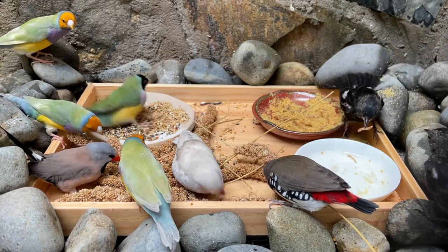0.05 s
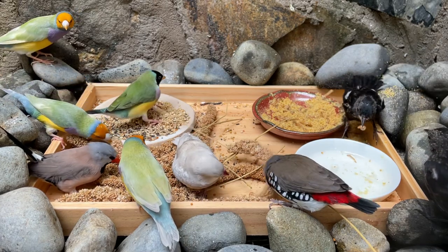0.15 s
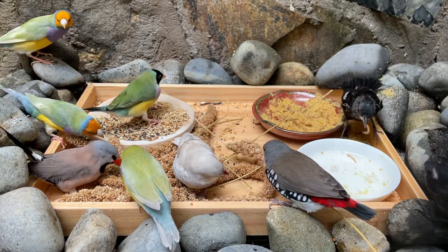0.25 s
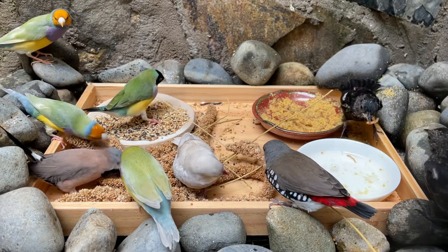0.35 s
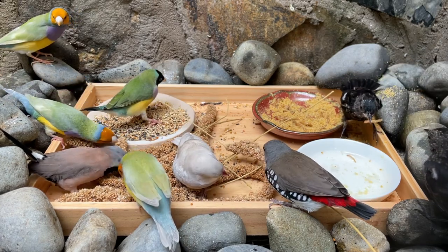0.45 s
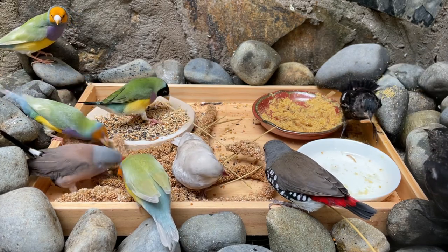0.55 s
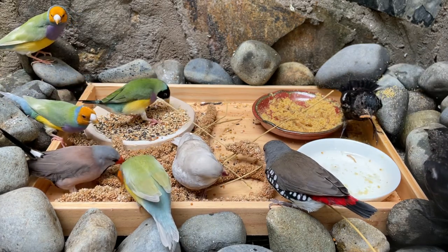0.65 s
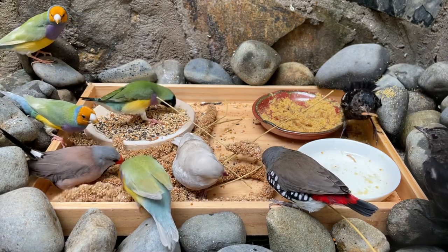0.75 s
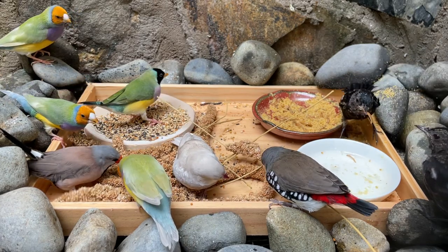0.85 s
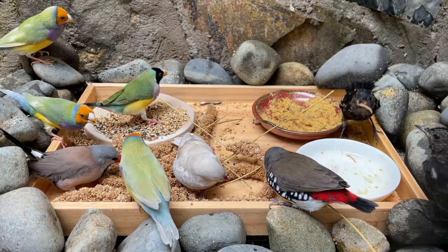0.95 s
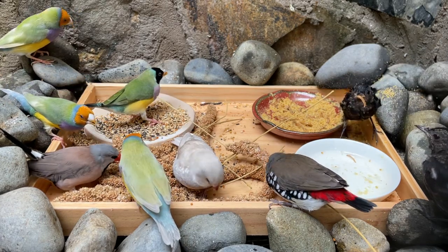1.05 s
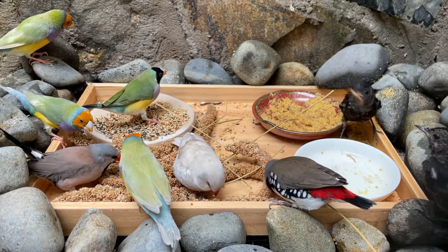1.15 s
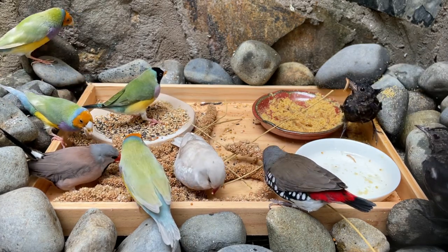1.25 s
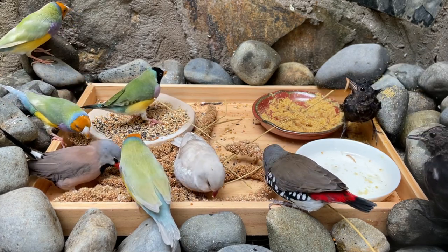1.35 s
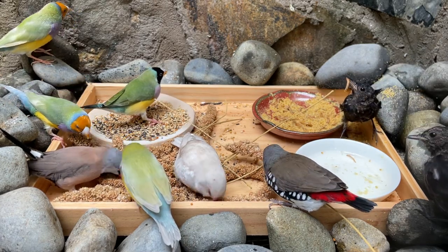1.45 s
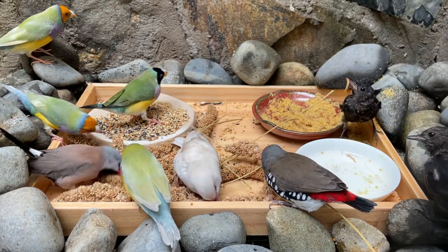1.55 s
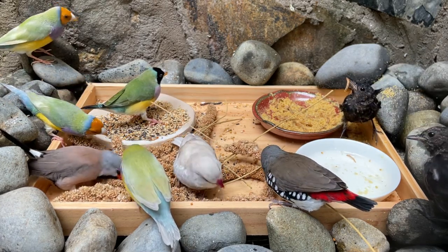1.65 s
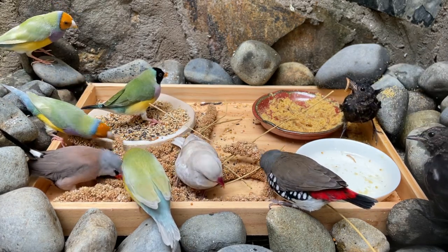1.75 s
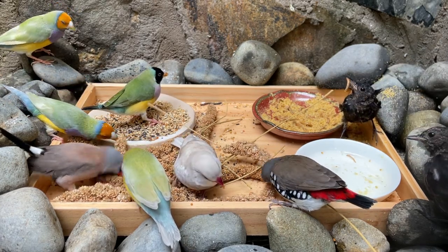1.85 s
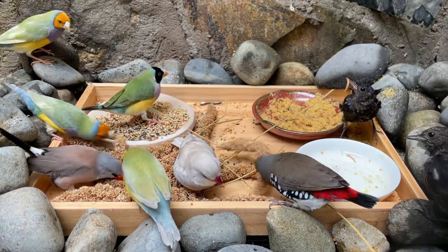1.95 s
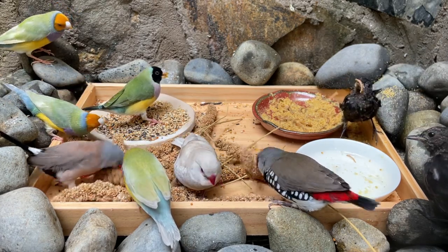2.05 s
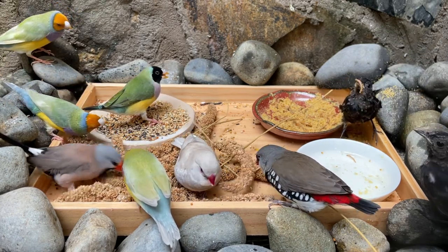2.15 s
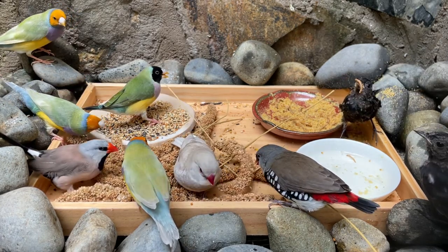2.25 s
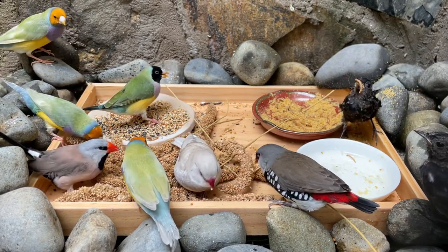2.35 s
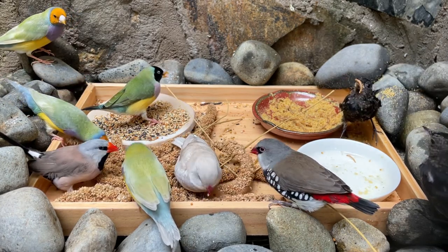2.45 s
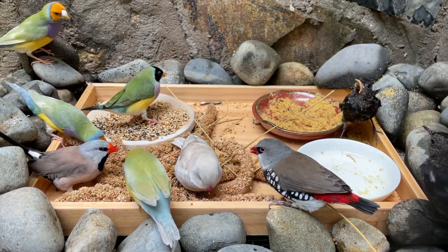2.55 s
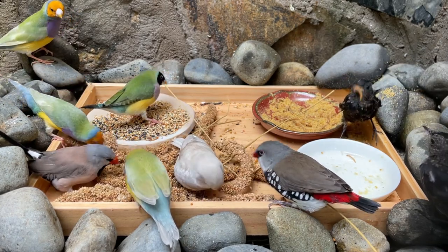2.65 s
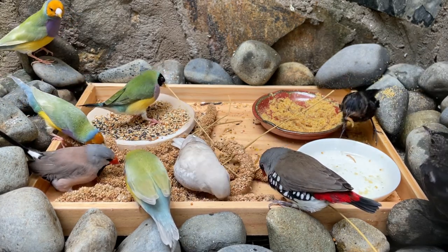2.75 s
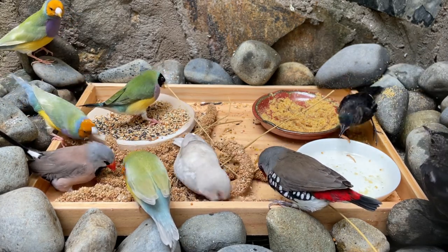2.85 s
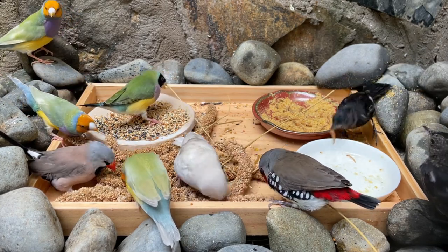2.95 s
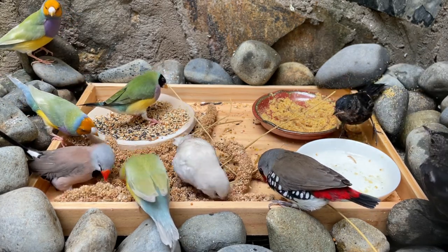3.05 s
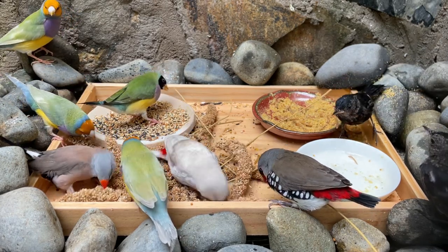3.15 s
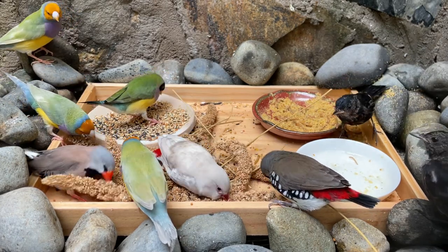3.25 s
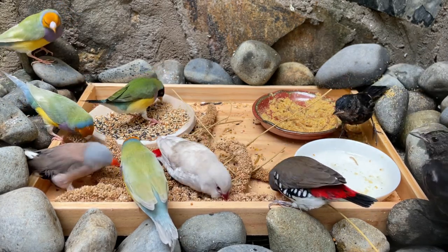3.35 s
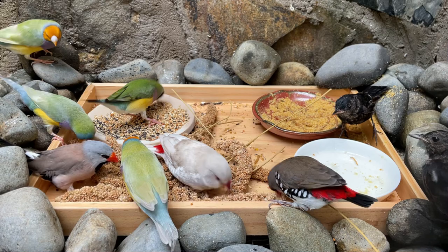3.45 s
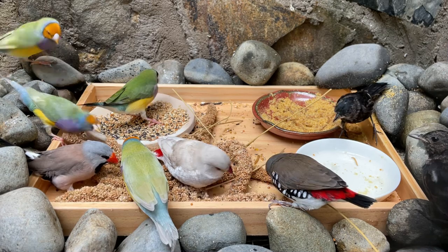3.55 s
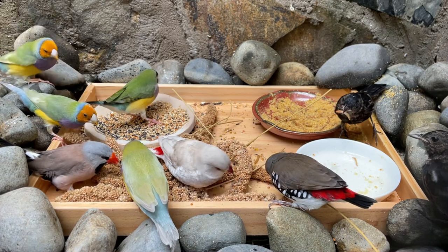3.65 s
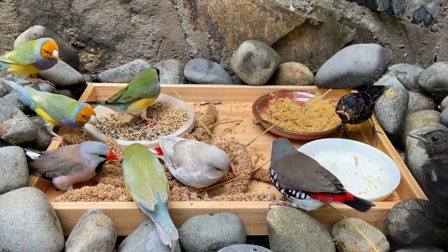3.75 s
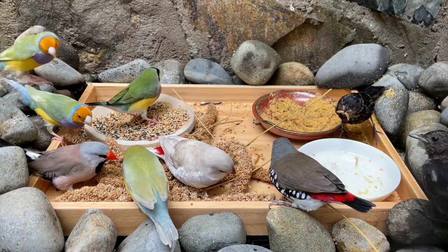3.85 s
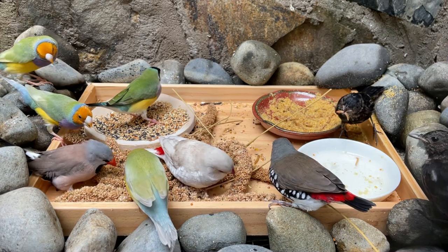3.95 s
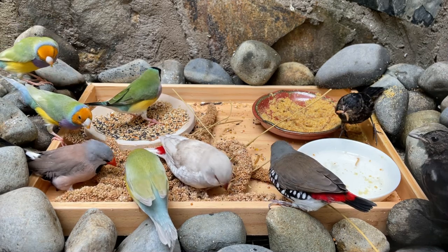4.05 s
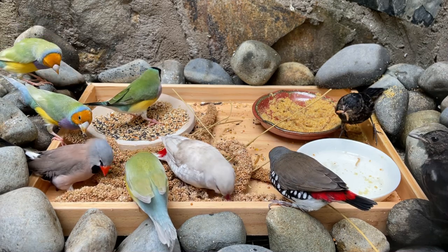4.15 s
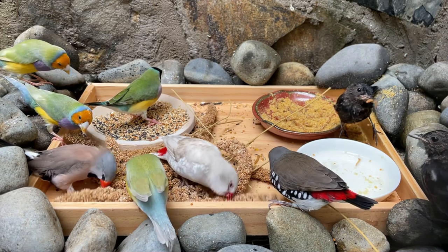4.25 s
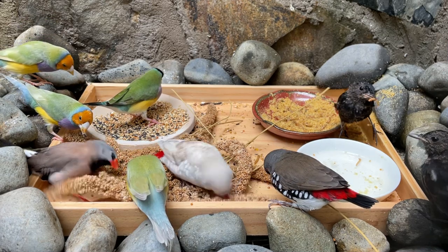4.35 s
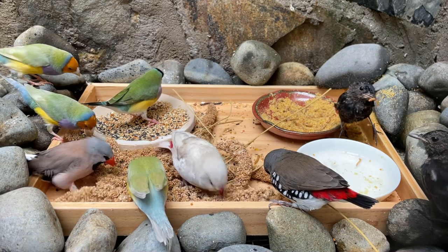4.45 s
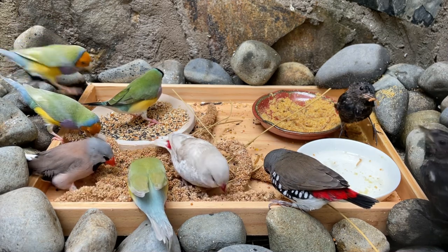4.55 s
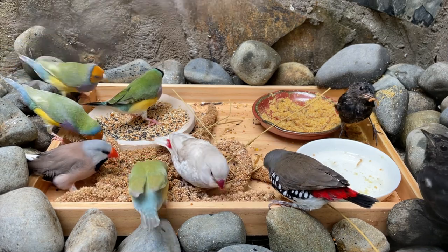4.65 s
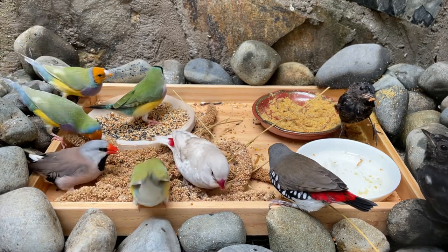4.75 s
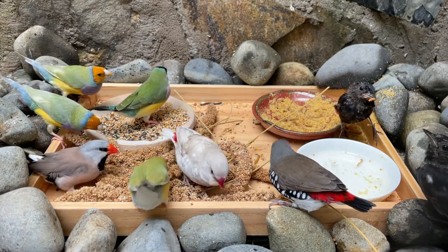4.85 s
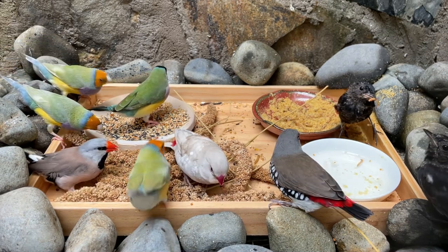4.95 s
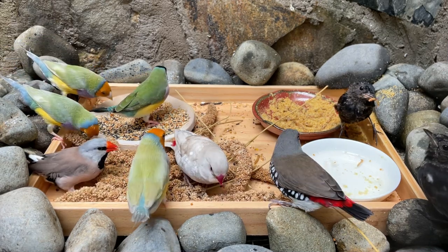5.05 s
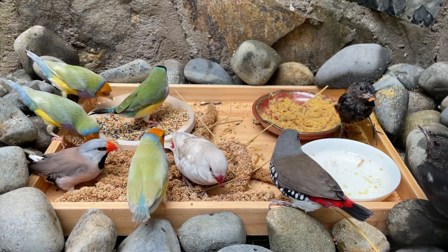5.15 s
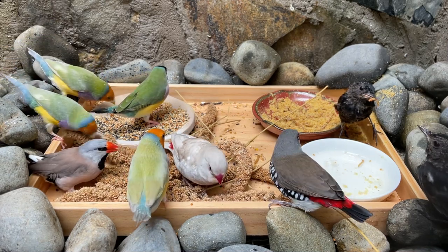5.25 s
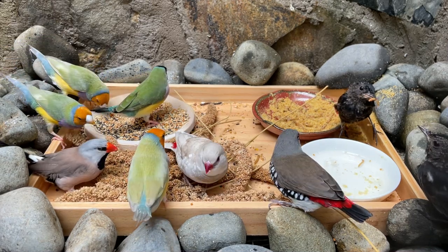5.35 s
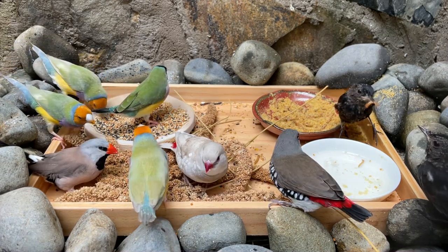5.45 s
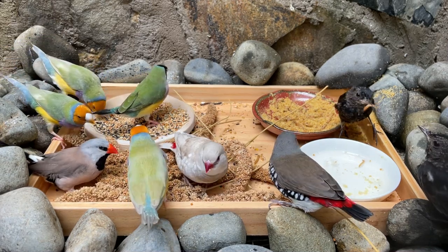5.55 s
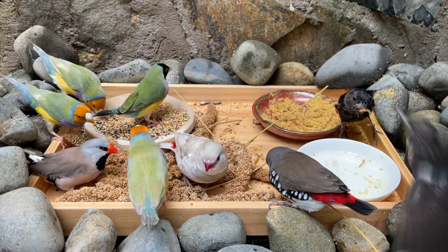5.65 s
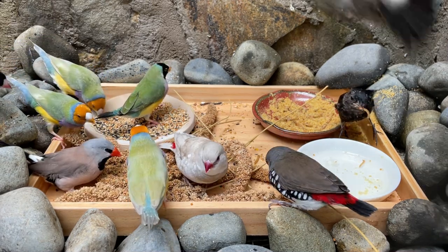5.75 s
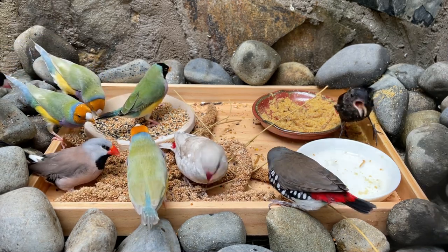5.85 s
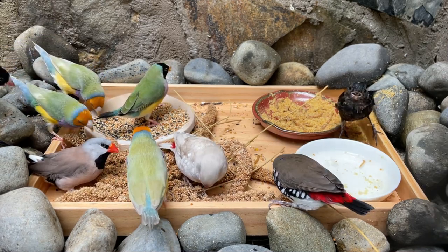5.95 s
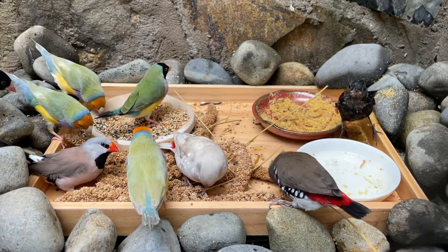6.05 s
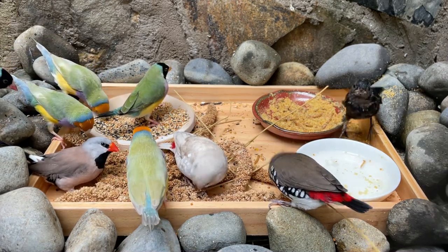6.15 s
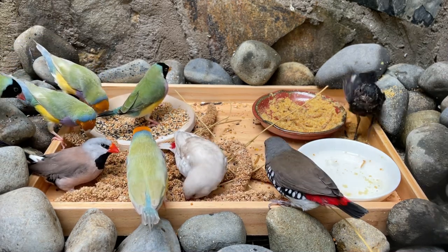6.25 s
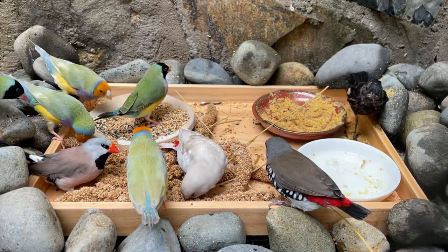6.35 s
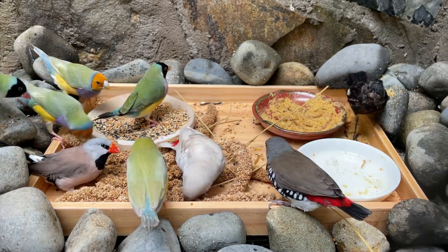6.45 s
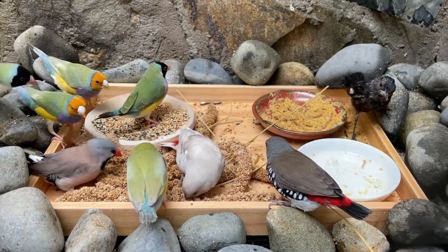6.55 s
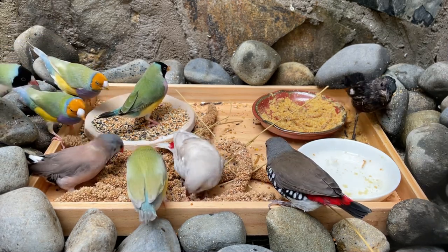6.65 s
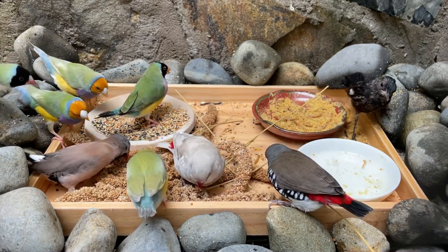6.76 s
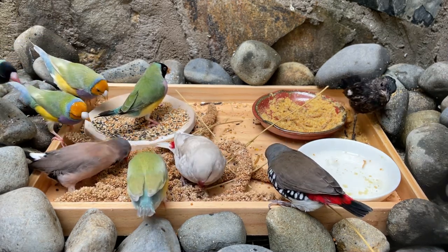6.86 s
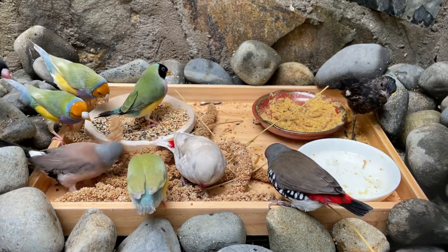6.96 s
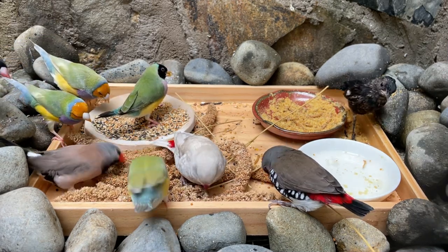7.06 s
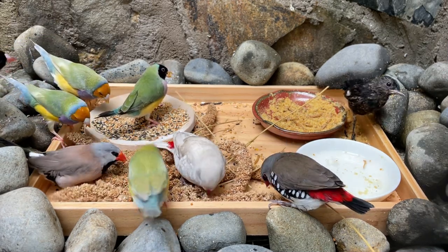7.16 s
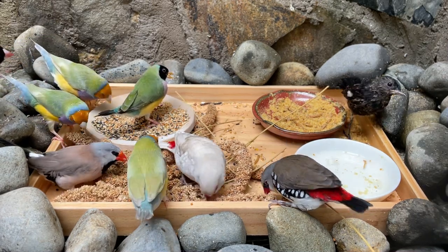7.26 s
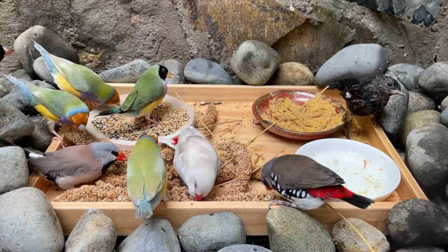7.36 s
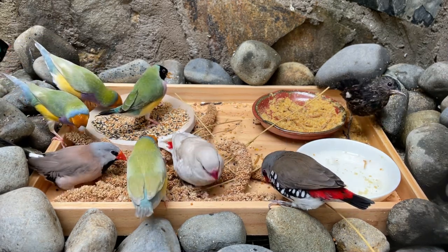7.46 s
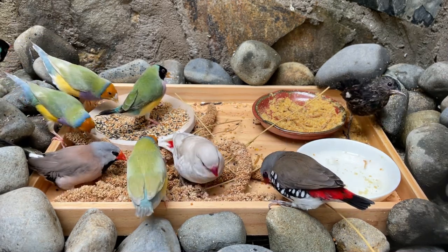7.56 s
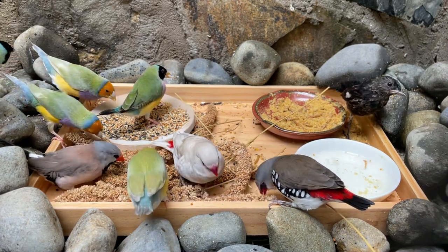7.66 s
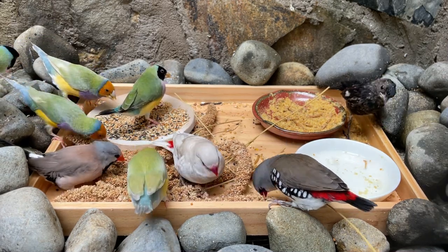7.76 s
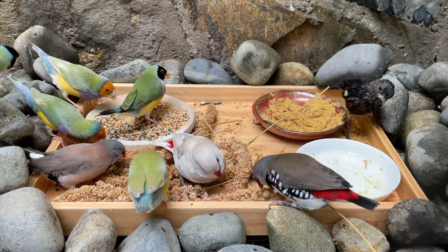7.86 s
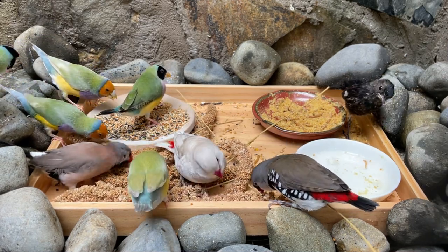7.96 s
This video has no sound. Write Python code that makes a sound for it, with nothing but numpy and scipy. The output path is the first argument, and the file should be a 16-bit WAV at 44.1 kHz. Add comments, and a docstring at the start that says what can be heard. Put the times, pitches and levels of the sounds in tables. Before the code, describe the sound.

Close to a wooden feeding tray in a hard-walled aviary, finches' beaks tick and crack dry seed irregularly. A short falling peep and a rising chirp come early, then a rasping scold, a clear whistle, a loud wing flurry with thumps and scolding, and a nasal call. Low rumble continues underneath, and calls leave a short echo.

```python
"""Finches at a seed tray

Finches feed at a wooden seed tray in a hard-walled aviary, close to a two-port microphone.
Beaks tap and crack seed (struck resonances), birds whistle (gliding overtones) and scold (noise rasps),
wings whoosh, feet shuffle and brief hisses join some calls (shaped noise), hops thump low (dying sines),
and the building rumbles and hums underneath. Near reflections and a dense hall tail surround the calls."""
import sys
import numpy as np
from scipy import signal
from scipy.fft import rfft, irfft
from scipy.io import wavfile
from scipy.ndimage import uniform_filter1d

SR = 44100
rng = np.random.default_rng(int(sys.argv[2]) if len(sys.argv) > 2 else 0)


def dump_mix(stems):
    """Bounce the given channels to the path in sys.argv[1] as a 16-bit WAV at rate SR."""
    frames = np.atleast_2d(stems).T  # one column per channel
    limited = np.clip(frames, -1, 1)  # hard clip at full scale
    pcm = np.round(limited * 32767).astype(np.int16)
    wavfile.write(sys.argv[1], SR, pcm)


N = 352932

# spectrum of rustle and bright hiss: (frequency [Hz], relative density [dB])
RUSTLE = [(800, 3), (1500, 9.5), (3000, 8), (6000, 5), (9000, 3.5), (13500, -1), (15500, 8.5)]


def gain_of(db):
    """Amplitude factor of a level in dB."""
    return 10 ** (np.asarray(db) / 20)


def evened(x):
    """Scales to an RMS of 1."""
    return x / np.sqrt(np.mean(x ** 2) + 1e-20)


def read(points, hz):
    """Interpolates a (frequency, value) table over log frequency."""
    f, value = np.transpose(points)
    return np.interp(np.log(hz + 1e-3), np.log(f), value)


def add(mix, start_s, sound, pan_db):
    """Adds a sound in place, louder on the left by pan_db."""
    part = mix[:, round(start_s * SR):][:, :len(sound)]
    part += gain_of([[pan_db / 2], [-pan_db / 2]]) * sound[:part.shape[1]]


def resonate(x, modes):
    """Sum of fixed resonances with steep flanks: each a two-fold pole around its centre, gain 1 there."""
    out, t = 0, np.arange(x.shape[-1]) / SR
    for hz, width_hz, db in modes:
        turn = np.exp(2j * np.pi * hz * t)
        r = np.exp(-np.pi * width_hz / SR)
        lowpassed = signal.lfilter([(1 - r) ** 2], [1, -2 * r, r * r], x / turn)
        out = out + gain_of(db) * 2 * (turn * lowpassed).real
    return out


def alike(z, hz, most=1):
    """Blends two unrelated spectra so that the channels agree by a likeness set for each frequency."""
    # likeness of the two channels: (frequency [Hz], coherence [0-1])
    likeness = [(60, 1), (160, 0.943), (270, 0.765), (500, 0.096), (1300, 0.033), (2200, 0.32),
                (4000, 0.267), (6500, 0.76), (8200, 1), (11500, 1), (15000, 1)]
    same = np.minimum(read(likeness, hz), most)[:, None]
    return np.array([z[0], same * z[0] + np.sqrt(1 - same ** 2) * z[1]])


def noise(spectrum, size, patchy_db, most=1):
    """Two channels of coloured noise, RMS 1, with patches of level drifting over time and frequency."""
    frames, hz = 4 * N // size + 5, np.fft.rfftfreq(size, 1 / SR)
    a, b, c, d, patches = rng.standard_normal((frames, len(hz), 5)).T
    patches = uniform_filter1d(patches, size=10, axis=0)
    patches = evened(uniform_filter1d(patches, size=12, axis=1))
    outside_db = -60 * ((hz < spectrum[0][0]) | (hz > spectrum[-1][0]))
    colour_db = (read(spectrum, hz) + outside_db)[:, None]
    z = alike((a + 1j * b, c + 1j * d), hz, most) * gain_of(colour_db + patchy_db * patches)
    return evened(signal.istft(z, nperseg=size, noverlap=3 * size // 4)[1][:, :N])


def rumble():
    """Low noise favouring the hall's standing waves, plus thumps that buffet the ports in opposition."""
    # slow level of the building's rumble: (time [s], deep level [dB], upper level [dB])
    levels = [(0.0, -44.5, -45), (0.33, -48.5, -50.5), (1.23, -47.5, -50.5), (1.63, -50, -42.5),
              (1.96, -41.5, -47), (2.41, -42.5, -45), (2.63, -47, -49), (3.85, -46, -45.5),
              (4.36, -44, -49.5), (4.77, -42.5, -47), (6.62, -46, -48), (7.26, -46.5, -47),
              (7.69, -45, -52.5), (8.0, -48.5, -47)]
    # deep band: (frequency [Hz], relative density [dB])
    deep = [(20, -44), (40, -4), (61, -17.5), (80, 0.5), (110, -50.5)]
    # upper band: (frequency [Hz], relative density [dB])
    upper = [(60, -17), (85, -3), (100, 0), (135, -4.5), (190, -10), (260, -44)]
    # standing waves: (frequency [Hz], width [Hz], relative gain [dB])
    hall_modes = [(61, 18.3, -0.5), (100.87, 14.22, 0.85), (135, 16.3, -5)]
    buffet = .34  # gain of the opposed part

    s, deep_db, upper_db = np.transpose(levels)
    t, (out, gust) = np.arange(N) / SR, thumps()
    thump_rms = np.sqrt(uniform_filter1d(out[0] ** 2, size=900).clip(0))
    shaken = thump_rms * noise(deep, size=4096, patchy_db=1.5)[0]
    shaken = shaken + gust[0] * noise(upper, size=4096, patchy_db=-2)[0]
    out = out + buffet * np.array([shaken, -shaken])
    for spectrum, db, extra in ((deep, deep_db, 0), (upper, upper_db, gust)):
        low = noise(spectrum, size=4096, patchy_db=0.0)
        low = evened(low + 1.975 * resonate(low, hall_modes))
        power = uniform_filter1d((low ** 2).mean(0), size=3000)
        steady = evened(low / (power + 0.13) ** 0.223)  # lumps are partly evened out
        out = out + (gain_of(np.interp(t, s, db)) + extra) * steady
    return out


def hush():
    """Steady broadband hush: coloured noise at a fixed level."""
    # steady hush: (frequency [Hz], relative density [dB])
    air = [(150, -1.5), (240, -4), (330, -0.5), (520, -7.5), (1300, -15), (2000, -23.5), (3000, -19),
           (5600, -27.5), (7400, -29.5), (9000, -34), (12000, -40.5), (14000, -33), (15500, -41)]
    return gain_of(-57.5) * noise(air, size=1024, patchy_db=2.5)


def shuffle():
    """Hiss of feet and feathers among dry husks, in small uneven surges."""
    # hiss before the surges: (time [s], level [dB])
    hiss = [(0.0, -66.5), (0.9, -77), (1.11, -68), (1.49, -67.5), (1.85, -62.5), (2.38, -62.5),
            (2.47, -72.5), (2.83, -65.5), (3.63, -69.5), (3.92, -69), (4.66, -68), (4.85, -57.5),
            (5.0, -58.5), (5.17, -66.5), (5.62, -81.5), (6.51, -70), (7.3, -76), (8.0, -71.5)]
    s, db = np.transpose(hiss)
    surge_db = 3.55 * evened(uniform_filter1d(rng.standard_normal(N), size=900))
    level_db = np.interp(np.arange(N) / SR, s, db) + surge_db
    return gain_of(level_db) * noise(RUSTLE, size=256, patchy_db=0.5)


def wings_and_hisses():
    """Whoosh and bright noise swell and fade for wings and brief hisses, all under one wing-beat throb."""
    # wings, but for bright hiss bursts with two of the scolds (4.728, 4.74 s): # (loudest [s], swell [s per 20
    # dB, sign ignored], fade [s per 20 dB], whoosh [dB], rustle or hiss [dB])
    swells = [(.1, 0.58, 0.69, -60, -62), (1.45, 0.2671, .5, -48, -72),
              (1.916, -0.23, 0.2751, -50.5, -52.5), (2.1, 0.24, .5, -53.5, -60.5),
              (2.401, 0.373, 0.07, -42, -52), (2.476, 0.08, 0.5753, -51, -62.5),
              (2.545, .015, 0.11, -60, -56.5), (3.16, 0.26, 0.48, -50.5, -58),
              (4.69, 0.0632, 0.1609, -34.5, -43.5), (4.715, 0.02, 0.0147, -31.5, -56.5),
              (4.728, 0.0054, 0.0315, -36, -35.5), (4.74, 0.0006, 0.0434, -43, -33),
              (4.8, -0.1854, 0.2926, -40.5, -55.5), (5.738, -0.02, 0.043, -43, -46),
              (5.77, -0.035, 0.01, -47.5, -58), (5.828, 0.0175, 0.17, -46.5, -56),
              (6.08, -0.72, 0.7658, -52.5, -64)]
    # low whoosh: (frequency [Hz], relative density [dB])
    whoosh = [(120, 5), (200, 1), (350, 1.5), (700, -7.5), (1500, -20), (3000, -32)]
    t, power = np.arange(N) / SR, np.zeros((2, N))
    for s, swell_s, fade_s, *dbs in swells:
        shape_db = -20 * np.maximum((s - t) / abs(swell_s), (t - s) / abs(fade_s))
        power += gain_of(np.add.outer(dbs, shape_db)) ** 2
    whoosh_level, bright_level = np.sqrt(power)
    beat_hz = 29 + 4.0 * evened(uniform_filter1d(rng.standard_normal(N), size=8000))
    phase = np.cumsum(beat_hz) / SR % 1
    beat = evened(1.24 + np.exp(-phase / 0.81))
    air = whoosh_level * noise(whoosh, size=1024, patchy_db=1.5, most=0.65)
    bright = bright_level * noise(RUSTLE, size=256, patchy_db=3.0)
    return beat * (air + bright)


def tap(husk_db, husk_hz, tick_db, knock_db):
    """A blow and a millisecond of crackle ring husk, beak and tray; husk modes near husk_hz are favoured."""
    # husk modes: (frequency [Hz], width [Hz], relative gain [dB])
    husk_modes = [(3350, 1180, -1.5), (4496, 473, 1), (5600, 1320, 2), (6853, 1100, 6)]
    # bright beak modes: (frequency [Hz], width [Hz], relative gain [dB])
    tick_modes = [(8260, 1150, -2.5), (9640, 690, -1.5), (10977, 1080, -3), (11896, 1050, -3),
                  (14350, 3000, -4.5)]
    # wooden tray modes: (frequency [Hz], width [Hz], relative gain [dB])
    tray_modes = [(700, 400, -12), (1200, 400, 0), (1750, 600, -5), (2500, 700, -12)]
    t = np.arange(1200) / SR
    crackle = rng.standard_normal((3, 1200)) * np.exp(-t / .0012) * np.minimum(t / .0003, 1)
    blows = crackle + 8 * (t == 0)
    husk = [(hz, width_hz, db - 16 * abs(np.log2(hz / husk_hz))) for hz, width_hz, db in husk_modes]
    out = 0
    for blow, modes, db in zip(blows, (husk, tick_modes, tray_modes), (husk_db, tick_db, knock_db)):
        part = resonate(blow, modes)
        peak_rms = np.sqrt(uniform_filter1d(part ** 2, size=130).max())
        out = out + gain_of(db) * part / peak_rms
    return out


def feeding():
    """Beaks on seed: the clear taps, and a random patter of 60 small ones."""
    # (time [s], husk [dB], husk pitch [Hz], bright tick [dB], tray knock [dB], left-right [dB])
    clear_taps = [(0.078, -64, 6290, -65, -63.5, 2), (0.0982, -54, 6030, -41.5, -75.5, 1),
                  (0.168, -54, 3350, -53.5, -57, 0), (0.2477, -52, 3940, -56.5, -70, 0),
                  (0.3413, -58, 4240, -57.5, -59, 0), (0.6395, -53, 6630, -54, -76, 0),
                  (0.7581, -49, 6640, -57.5, -74, -2), (0.853, -49.5, 5220, -55.5, -81, 4.5),
                  (0.961, -50, 3590, -56.5, -70.5, 4.5), (0.9953, -54, 5430, -55, -78, 2),
                  (1.215, -50, 5580, -49, -67, 0.5), (1.344, -48.5, 4560, -46, -71, 3),
                  (1.5526, -46.5, 3920, -52.5, -73, 5), (1.6168, -53.5, 3580, -69.5, -59, 2.5),
                  (1.965, -66, 6500, -50, -75.5, 1), (2.308, -56, 4930, -60.5, -50.5, 4),
                  (2.3467, -48.5, 3460, -59, -47, 4), (2.386, -48, 5810, -49.5, -48.5, 4.5),
                  (2.415, -60, 3130, -51, -64.5, 1), (2.4521, -47, 3900, -46, -55, 3),
                  (2.5233, -48.5, 4220, -43.5, -71, 1.5), (3.1586, -49, 3160, -58.5, -52, 0.5),
                  (3.357, -60, 4530, -67, -65, 0.5), (3.4366, -50.5, 3010, -71.5, -40.5, 3),
                  (3.485, -56.5, 3300, -74.5, -54, 3), (3.5236, -45, 4000, -78, -77, 1),
                  (3.664, -35.5, 3300, -42.5, -47.5, 5), (3.7494, -50.5, 5600, -51.5, -73, 3.5),
                  (3.779, -47.5, 4900, -50.5, -89, 3.5), (3.8858, -59, 4500, -75.5, -77, 0),
                  (4.396, -57, 5470, -54.5, -86.5, 1), (4.9053, -50.5, 6220, -65.5, -53, 3),
                  (4.9374, -55.5, 3240, -45.5, -53, 2), (5.3517, -52.5, 4100, -59.5, -61.5, 1),
                  (5.6626, -47.5, 4300, -47, -75, 3), (5.7124, -45.5, 3900, -48.5, -60.5, 5),
                  (5.7383, -50, 3000, -45.5, -49.5, 1), (5.8205, -36, 3200, -36, -45, -2),
                  (5.871, -50, 3460, -57.5, -54, 4), (6.3088, -55, 4900, -57.5, -62, 3),
                  (6.4454, -54, 4320, -58.5, -83.5, 3), (6.5484, -49, 3000, -55.5, -63.5, 1.5),
                  (6.7268, -41, 3800, -46, -63, 2), (6.884, -44.5, 3500, -40.5, -70.5, 2.5),
                  (7.202, -54.5, 4440, -59, -59.5, 2.5), (7.396, -56, 4570, -51, -56, 0),
                  (7.3999, -46.5, 3000, -68, -49, 2), (7.6356, -48.5, 4060, -57.5, -74, 8),
                  (7.7262, -72, 3120, -55, -75.5, 1), (7.7961, -54, 4130, -44, -79, 0)]
    out = np.zeros((2, N))
    for s, husk_db, husk_hz, tick_db, knock_db, pan_db in clear_taps:
        add(out, s, tap(husk_db, husk_hz, tick_db, knock_db), pan_db)
    for when, size, bright, pan in rng.random((60, 4)):
        small = tap(0, 3300 + 3000 * bright, 12 * bright - 6, -20)
        add(out, when * N / SR, gain_of(-70 + 6 * size) * small, 8 * pan - 4)
    return out


def chirp(rows, first, rough, flutter=0):
    """Partials first, first + 1, ... of a gliding pitch; roughness shakes pitch and level, flutter trills them."""
    s, hz, *levels_db = np.transpose(rows)
    t = np.arange(s[0], s[-1], 1 / SR)
    shake = evened(uniform_filter1d(rng.standard_normal((SR // 2, 2)), size=50, axis=0))[:len(t)].T
    trill = flutter * np.sin(2 * np.pi * 55 * (t - s[0]))
    glide_hz = uniform_filter1d(np.interp(t, s, hz), size=120)
    pitch_hz = glide_hz * (1 + 0.044 * rough * shake[0] + 0.061 * trill)
    turns = np.cumsum(pitch_hz) / SR
    tone = 0
    for k, db in enumerate(levels_db):
        tone = tone + gain_of(np.interp(t, s, db)) * np.sin(2 * np.pi * (first + k) * turns)
    level = (1 + rough * shake[1] + trill) * signal.windows.tukey(len(t), .12)
    return s[0], np.sqrt(2) * tone * level


def voices():
    """Whistles, a nasal call and faint peeps as gliding partials; the second return feeds the echo."""
    # one table a whistle: (time [s], pitch [Hz], tone [dB], then each overtone in turn [dB])
    whistles = [
        [(.581, 7100, -54.5, -89.5, -99), (.595, 7100, -48.5, -59, -99), (.599, 6290, -47, -57, -99),
         (.604, 5003, -51.5, -59.5, -99), (.611, 3074, -51, -85.5, -99)],
        [(1.881, 2189, -59.5, -77, -80, -70), (1.888, 2372, -40.5, -60, -68, -55),
         (1.897, 2847, -42.5, -51, -64.5, -52), (1.901, 3110, -48.5, -58, -65, -58.5),
         (1.906, 3894, -44, -63, -62.5, -90), (1.911, 4413, -44.5, -61, -63, -90),
         (1.919, 4500, -59.5, -69.5, -75, -90)],
        [(3.573, 3942, -58.5, -84, -95), (3.588, 3436, -46, -67, -90.5), (3.625, 3325, -40.5, -62, -70),
         (3.642, 3291, -27.5, -66.5, -60), (3.66, 3225, -24, -67, -58.5), (3.679, 3197, -29, -65, -75.5),
         (3.692, 2980, -52.5, -66, -94.5)],
    ]
    # one row a whistle: (left-right [dB], roughness [0-1], echo send [dB])
    perches = [(1.5, 0.3, 0.5), (2.5, 0.31, -0.5), (4.5, 0.05, -16)]
    # call with a silent fundamental: (time [s], fundamental [Hz], partials 2, 3, 4, 5 [dB])
    nasal = [(5.066, 1600, -44, -80.5, -85, -90), (5.072, 2097, -50.5, -80, -85, -79.5),
             (5.077, 1577, -44, -70.5, -83.5, -62.5), (5.083, 2225, -44.5, -48, -54.5, -56),
             (5.095, 2332, -35.5, -54.5, -59, -57.5), (5.115, 2326, -37.5, -36.5, -59.5, -59),
             (5.135, 2220, -42, -44.5, -58.5, -63.5), (5.145, 2133, -40.5, -47.5, -63.5, -62),
             (5.156, 2023, -64.5, -46.5, -74, -67.5)]
    # (start [s], length [s], first, last pitch [Hz before peep_ratio], level [dB], flutter [0-1], echo send [dB])
    peeps = [(.097, .015, 6000, 5900, -60, .1, 3.0), (1.484, .05, 5500, 5000, -67, .7, .6),
             (3.85, .15, 5800, 5750, -79, .5, 3), (6.125, .04, 2200, 2150, -71, .6, -4),
             (6.2, .05, 2150, 2200, -71, .6, -4), (6.95, .15, 6000, 5850, -76, .4, 3),
             (7.475, .11, 5750, 4350, -69, .9, 3), (1.555, .045, 4680, 4650, -62, .05, -9),
             (2.99, .03, 4950, 4950, -65, .05, -12), (5.798, .016, 3500, 3500, -60, .05, -15),
             (5.868, .007, 2600, 2600, -54, .05, -15)]
    peep_ratio = 0.9662  # sounding frequency / listed pitch

    near, echo = np.zeros((2, N)), np.zeros((2, N))
    calls = []
    for rows, (pan_db, rough, echo_db) in zip(whistles, perches):
        calls.append((chirp(rows, first=1, rough=rough), pan_db, echo_db))
    calls.append((chirp(nasal, first=2, rough=0.042), 4.5, -6.0))
    for s, length_s, first_hz, last_hz, db, flutter, echo_db in peeps:
        rows = [(s, first_hz, db), (s + length_s, last_hz, db)]
        calls.append((chirp(rows, first=peep_ratio, rough=0.145, flutter=flutter), 0, echo_db))
    for (s, sound), pan_db, echo_db in calls:
        add(near, s, sound, pan_db)
        add(echo, s, gain_of(echo_db) * sound, pan_db)
    return near, echo


def hums():
    """Low sines wavering in pitch that swell and fade in the rumble, the same in both channels."""
    # (start [s], length [s], mean pitch [Hz], peak level [dB])
    tones = [(.12, 0.183, 125.1, -42.5), (1.38, 0.44, 135, -39), (2.1, 0.395, 136.6, -43.5),
             (2.846, 0.68, 97.3, -45.5), (3.62, 0.272, 154.4, -48), (3.95, 0.93, 59.56, -42.5),
             (4.42, 0.345, 154.9, -49.5), (5.12, 0.364, 103, -40), (5.09, 0.46, 58.72, -41),
             (5.5, 0.475, 135, -50.5), (7.15, 0.208, 163.3, -52), (7.446, 0.604, 61, -39)]
    out = np.zeros((2, N))
    for s, length_s, hz, db in tones:
        count = round(length_s * SR)
        waver = 1 + 0.0154 * evened(uniform_filter1d(rng.standard_normal(SR), size=3000))[:count]
        tone = np.sin(2 * np.pi * np.cumsum(hz * waver) / SR)
        add(out, s, gain_of(db) * tone * signal.windows.tukey(count, .7), 0)
    return out


def thumps():
    """Hops and landings: dying low sines; the second return is the gust each stirs in the upper rumble."""
    # (start [s], peak of envelope [dB], pitch [Hz], t60 [s], gust [dB])
    landings = [(2.254, -37, 64.4, .2, -45), (2.327, -29.5, 60.4, .15, -51.5),
                (2.367, -24.5, 59.6, 0.12, -40.5), (2.408, -20, 58.9, 0.086, -49.5),
                (2.475, -26.5, 53.5, 0.215, -55), (2.724, -27.5, 56.8, 0.208, -65),
                (2.85, -34, 62.27, 0.213, -51), (2.95, -37, 64.2, 0.116, -51.5),
                (4.683, -17.5, 60.3, 0.095, -24.5), (4.704, -10, 65.68, 0.179, -30),
                (4.742, -16.5, 73.55, 0.136, -27), (4.825, -28.5, 70, 0.14, -40),
                (4.93, -31.5, 58, 0.34, -49), (5.44, -39.5, 59, 0.102, -58.5),
                (5.835, -30.5, 62.1, 0.2, -44), (5.885, -29, 61.3, 0.182, -46),
                (6.079, -29.5, 60.5, 0.25, -49.5), (6.62, -38.5, 59.17, 0.4, -59.5)]
    rise_s = 0.0129
    out, gust, t = np.zeros((2, N)), np.zeros((2, N)), np.arange(SR // 2) / SR
    for s, db, hz, t60_s, gust_db in landings:
        shape = (1 - np.exp(-(t / rise_s) ** 2)) * gain_of(-60 * t / t60_s)
        shape = shape / shape.max()
        add(out, s, gain_of(db) * shape * np.sin(2 * np.pi * hz * t), 0)
        add(gust, s, gain_of(gust_db) * shape, 0)
    return out, gust


def scolds():
    """Short noise rasps pass chest and throat and ring in the gape; the second return feeds the echo."""
    # bursts, three or four a scold: (start [s], level before envelope [dB], gape ring [Hz], chest [dB],
    # left-right [dB], echo send [dB], ring re rasp [dB])
    bursts = [(2.6914, -24, 4210, -18, 3, -10.5, -2), (2.7044, -14.5, 5116, -28.5, 1, -27, 0),
              (2.718, -18, 4900, -19.5, 1.5, -32.5, 0.5), (2.732, -35.5, 4020, -10.5, 2.5, -17.5, -0.5),
              (4.7267, -21, 5570, -27, 2.5, -24.5, -3.5), (4.74, -13, 3545, -25, 0.5, -24, -11.5),
              (4.7539, -22.5, 4229, -11.5, 6.5, -34, 3.5), (5.4072, -34.5, 4920, -15, 9, -10, -3),
              (5.42, -23.5, 5044, -22, -2, -13.5, -5.5), (5.4335, -27.5, 5150, -25.5, 9, -13.5, 2.5)]
    # throat: (frequency [Hz], gain [dB])
    throat = [(2200, -27.5), (2900, -10), (3700, -4.5), (4300, -1), (5200, -4.5), (6500, -7.5), (8100, -20),
              (11600, -23.5), (16400, -33.5)]
    # chest, before each burst's chest level: (frequency [Hz], gain [dB])
    chest = [(800, -33), (1250, -2.5), (1750, 9), (2600, 9.5), (3300, 2), (4500, -39)]
    rise_s, fall_s, tail, tail_s = 0.00139, 0.00198, 0.148, 0.01005

    out, echo = np.zeros((2, N)), np.zeros((2, N))
    t, hz = np.arange(1024) / SR, np.fft.rfftfreq(1024, 1 / SR)
    shape = (1 - np.exp(-(t / rise_s) ** 2)) * (np.exp(-t / fall_s) + tail * np.exp(-t / tail_s))
    for s, db, gape_hz, chest_db, pan_db, echo_db, ring_db in bursts:
        colour = gain_of(read(throat, hz)) + gain_of(chest_db + read(chest, hz))
        rasp = evened(irfft(colour * np.exp(2j * np.pi * rng.random(len(hz)))))
        ring = gain_of(ring_db) * np.sqrt(2) * np.sin(2 * np.pi * gape_hz * t)
        add(out, s, gain_of(db) * (rasp + ring) * shape, pan_db)
        # the hall hears the mean colour, as a pulse 2 ms late, and the ring
        pulse = evened(irfft(colour * np.exp(-2j * np.pi * hz * .002)))
        add(echo, s, gain_of(db + echo_db) * (pulse + 1.46 * ring * shape), pan_db)
    return out, echo


def nearby(x):
    """A few single reflections from stones and near walls, 6 % later on the right."""
    # (left delay [s], level [dB])
    early = [(.0042, -7), (.0072, -9), (.021, -16), (0.031, -26.5)]
    out = x.copy()
    for delay_s, db in early:
        for side, stretch in enumerate((1, 1.06)):
            lag = round(delay_s * stretch * SR)
            out[side, lag:] += gain_of(db) * x[side, :-lag]
    return out


def hall(x):
    """Reverberation: sparse taps of random sign, each band dying at its own speed."""
    # (frequency [Hz], t60 [s])
    decay = [(500, 0.64), (2000, 0.544), (5000, 0.457), (8000, 0.319), (14000, 0.44)]
    taps = np.zeros((2, SR))
    at = np.arange(300, SR - 20, 20) + rng.integers(0, 20, (2, (SR - 301) // 20))
    np.put_along_axis(taps, at, rng.choice([-1., 1.], at.shape), 1)
    hz, t, z = signal.stft(taps, SR, nperseg=256)
    fade = gain_of(-60 * t / read(decay, hz)[:, None])
    tail = signal.istft(alike(z, hz) * fade, SR, nperseg=256)[1]
    tail = tail / np.linalg.norm(tail[0])
    return signal.fftconvolve(x.mean(0)[None], tail, axes=1)[:, :N]


def scene():
    """Sums the bed, the birds, their near reflections and the hall's echo."""
    taps, (scold, scold_echo), (voice, voice_echo) = feeding(), scolds(), voices()
    bed = rumble() + hums() + hush() + shuffle()
    echo = hall(gain_of(-10.0) * taps + scold_echo + voice_echo)
    return bed + wings_and_hisses() + taps + nearby(scold + voice) + echo


def record(dry):
    """The two ports differ in level and phase with frequency; then overall tone and a 16.5 kHz band limit."""
    # left-right level: (frequency [Hz], level [dB])
    lean = [(100, -1), (400, 0.5), (1300, 1.0), (3000, 2), (4800, 3), (6500, 1.5), (8500, -1)]
    # phase by which the right port leads: (frequency [Hz], phase [rad])
    port_lead = [(2000, 0), (4500, -.4), (5700, .4), (6550, 1.0), (7400, 2.4), (8250, 3.14), (11400, 6.28),
                 (14700, 9.42), (16500, 11)]
    # overall tone, falling below 30 Hz and above 13.5 kHz: (frequency [Hz], gain [dB])
    tone = [(15, -20), (30, -1), (45, 0.5), (13500, -0.5), (14500, -3.0), (15500, -7.5), (16500, -12)]
    hz = np.fft.rfftfreq(N, 1 / SR)
    half = gain_of(read(lean, hz) / 2) * np.exp(-.5j * read(port_lead, hz))
    ported = irfft(rfft(dry) * gain_of(read(tone, hz)) * np.array([half, 1 / half]), N)
    lowpass = signal.firwin(511, 16500, window=("kaiser", 9), fs=SR)
    return signal.oaconvolve(ported, lowpass[None], "same")


dry = scene()
out = record(dry)
dump_mix(out)
```